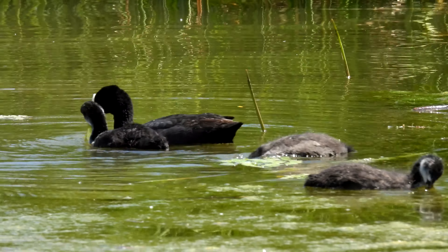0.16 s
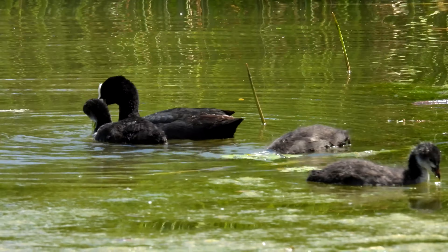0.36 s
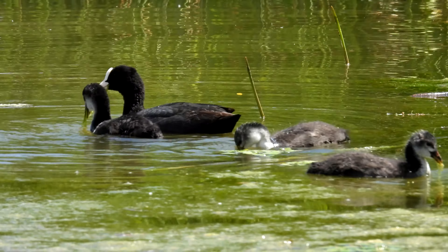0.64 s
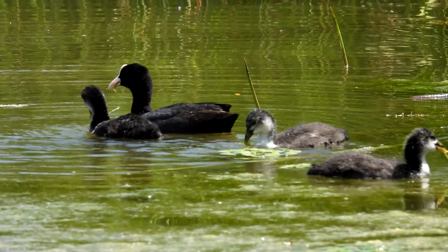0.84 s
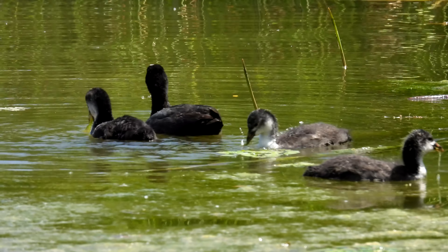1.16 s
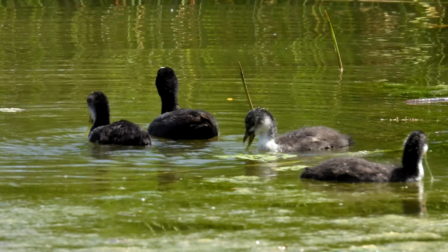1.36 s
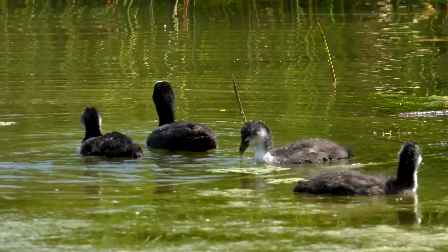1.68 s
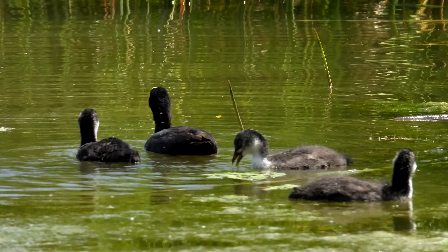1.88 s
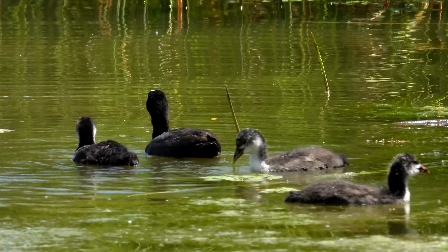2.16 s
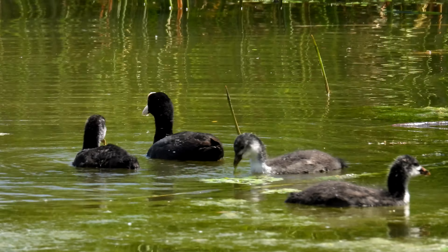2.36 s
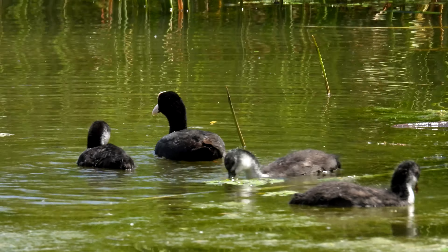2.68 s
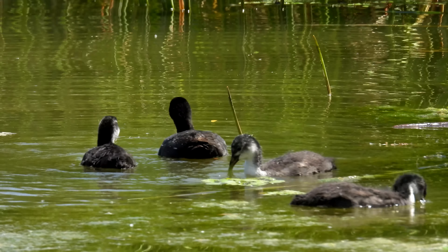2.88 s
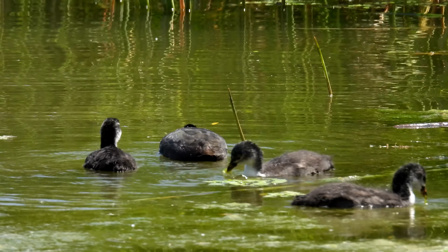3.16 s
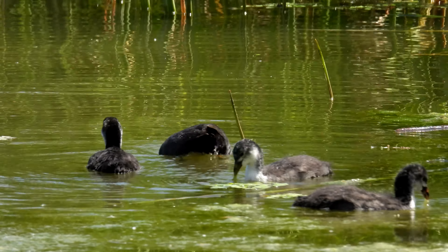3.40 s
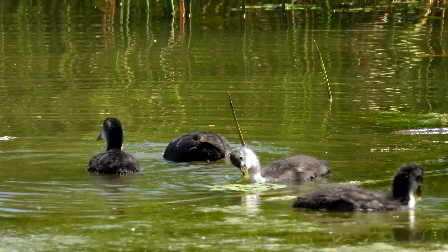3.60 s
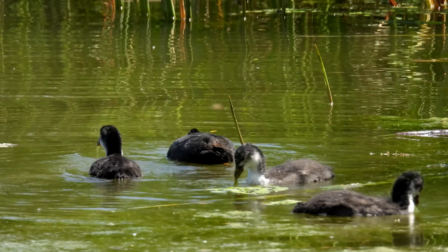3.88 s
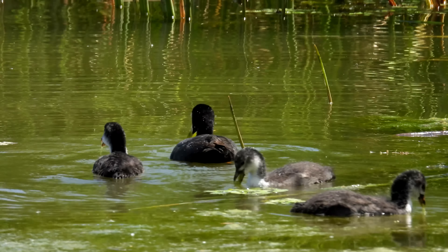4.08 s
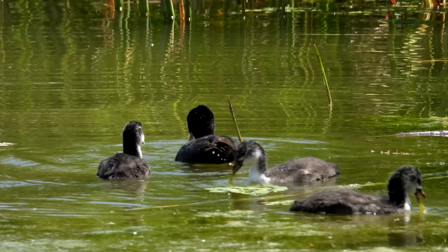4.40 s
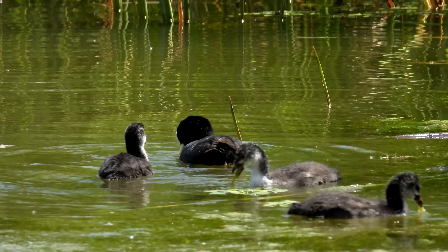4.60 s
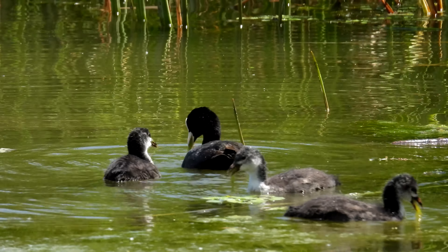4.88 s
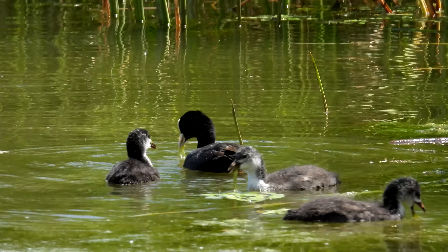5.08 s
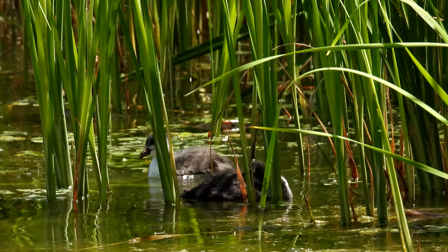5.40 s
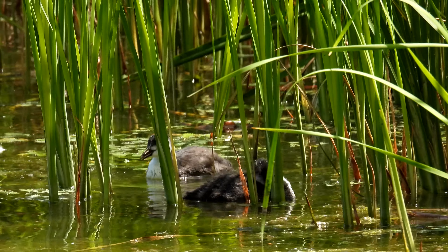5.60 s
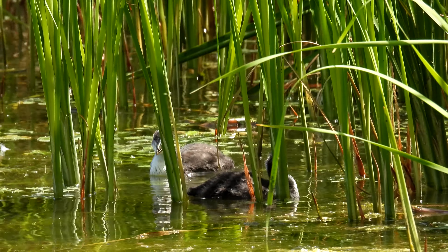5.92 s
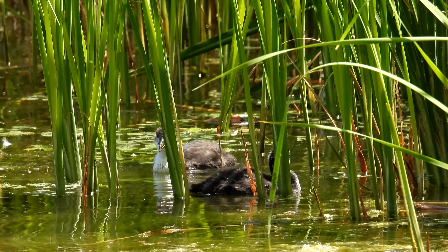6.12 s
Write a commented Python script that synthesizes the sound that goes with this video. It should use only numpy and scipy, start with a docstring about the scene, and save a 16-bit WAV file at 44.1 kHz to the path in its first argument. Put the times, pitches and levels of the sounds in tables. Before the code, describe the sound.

Rapid, scratchy warbler song bursts and pauses beside a reedy pond, with faint birds beyond, then two short frog croaks and a tiny water tick.

```python
"""You hear a reed warbler at a pond: nasal chatter, rasps, looping whistles, buzzes, a trill and paired chirps.
Other birds call farther off, over a faint hiss; near the end a frog croaks twice and one water drop ticks.
Each kind of syllable is one gesture of pitch and level, sung by a stack of harmonics that can turn rough.
Frog pulses ring three resonances, the drop is a fading burst of noise and the air is filtered noise.
Sparse echoes scatter the near song among the reeds and blur the fainter calls."""
import sys
import numpy as np
from scipy import signal
from scipy.fft import rfft, irfft, next_fast_len
from scipy.io import wavfile
from scipy.ndimage import uniform_filter1d

SR = 44100
rng = np.random.default_rng(int(sys.argv[2]) if len(sys.argv) > 2 else 0)


def inscribe(sig):
    """Save sig as 16-bit PCM at rate SR to the path in sys.argv[1].

    A 1-D sig is mono; a 2-D sig holds one channel per row.
    Samples are clipped to [-1, 1] before scaling.
    """
    pcm = np.round(np.clip(np.atleast_2d(sig).T, -1, 1) * 32767)
    wavfile.write(sys.argv[1], SR, pcm.astype(np.int16))


N = 275622
TIME = np.arange(N) / SR  # seconds

# Base levels in these tables come before the shaping of each note, filters and distance.
# Short flat notes. Each row: start in seconds, length in seconds, lowest pitch in Hz, base level in dB.
CHATTER_NOTES = [(0, 0.01, 1087, -24), (0.044, 0.019, 1117, -26.5), (0.156, 0.021, 1105, -25),
                 (0.215, 0.032, 1087, -24.5), (3.428, 0.039, 1078, -41), (3.477, 0.038, 1079, -37),
                 (3.515, 0.024, 1064, -38.5), (3.538, 0.039, 1121, -36), (3.727, 0.044, 1073, -35),
                 (3.779, 0.017, 1157, -29), (3.793, 0.027, 1125, -32), (3.827, 0.036, 1099, -33.5),
                 (3.861, 0.018, 1061, -40)]
# Nasal notes, held and then bent. Each row: start in seconds, length in seconds, held pitch in Hz,
# bend as a share of the pitch, base level in dB, tilt in dB per harmonic.
NASAL_NOTES = [(0.027, 0.022, 1365, -0.19, -32.5, 3.5), (0.046, 0.013, 1464, 0.35, -25, 1.5),
               (0.064, 0.023, 1362, -0.23, -23.5, 1.5), (0.101, 0.031, 1386, -0.061, -21, 1.5),
               (0.227, 0.015, 1355, 0.17, -31.5, 1.5), (0.244, 0.016, 1469, 0.33, -26.5, 2),
               (0.261, .025, 1347, -0.22, -25, 1), (0.284, 0.013, 1509, 0.085, -23.5, 1.5),
               (0.303, 0.026, 1351, 0.064, -22, 1), (3.086, 0.12, 1400, -0.28, -35, 0)]
# Quick slurs up or down. Each row: start in seconds, length in seconds, first pitch in Hz,
# last pitch in Hz, base level in dB.
QUICK_SLURS = [(0.055, 0.012, 1505, 2480, -17.5), (0.078, 0.011, 1860, 2295, -17.5),
               (0.086, 0.017, 1503, 1805, -17), (0.255, 0.0128, 1486, 2230, -24),
               (0.278, 0.0084, 1818, 2340, -15.5), (0.294, 0.009, 1530, 1820, -18.5),
               (0.671, 0.0042, 2190, 1855, -18.5), (1.089, 0.015, 1803, 1240, -30.5),
               (1.352, 0.013, 2183, 2140, -31), (1.591, 0.0077, 1790, 1590, -32),
               (1.675, 0.014, 1857, 1260, -30)]
# Rasps. Each row: start in seconds, length in seconds, top pitch before flutter in Hz, base level in dB.
RASP_NOTES = [(0.42, 0.12, 2388, -32), (0.65, 0.11, 2034, -28)]
# Looping whistles. Each row: time of the opening flick in seconds, time of the crest in seconds,
# trough pitch in Hz, crest pitch in Hz, base level in dB.
LOOPING_WHISTLES = [(0.91, 1.006, 1550, 1813, -34), (1.108, 1.175, 1609, 2212, -34.5),
                    (1.352, 1.444, 1677, 2077, -34), (1.585, 1.675, 1637, 2046, -35)]
# Two-voiced buzzes. Each row: start in seconds, length in seconds, top pitch of the upper voice in Hz,
# place of the top from 0 to 1, base level in dB.
BUZZ_NOTES = [(1.93, 0.1, 1158, 0.51, -34), (2.021, 0.042, 1044, 0.73, -39.5),
              (2.175, .138, 1139, .62, -36), (2.477, 0.12, 1124, 0.48, -37.5)]
# Path of the trill. Each row: time in seconds, pitch in Hz, base level in dB.
TRILL_PATH = [(2.748, 1494, -46.5), (2.782, 1753, -39), (2.9, 1749, -36.5), (2.988, 1807, -41.5)]
# Rising chirps, in pairs. Each row: start in seconds, length in seconds, top pitch in Hz,
# base level in dB, resonance of the open beak in Hz, roughness from 0 to 1.
PAIRED_CHIRPS = [(4.032, 0.077, 737, -35.5, 4380, 0.4), (4.13, 0.054, 688, -35, 4190, 0.27),
                 (4.312, 0.061, 707, -35, 4100, 0.61), (4.387, 0.065, 680, -34, 4150, 0.27),
                 (4.786, 0.056, 689.5, -34.5, 3540, 0.39), (4.862, 0.063, 671, -34, 3470, 0.29)]

# The throat favours other harmonics for each kind of syllable.
# Each list: relative strength in dB of harmonic 1, 2, 3, and so on.
CHATTER_HARMONICS = [-44, -9.5, 6.5, -4.5, -24, -26, -47]
NASAL_HARMONICS = [-30.5, -10, -1, -19, -31.5, -30, -24, -28.5]
# Nearly pure tone on harmonic 2, as above: relative dB of harmonic 1, 2, 3.
PURE_HARMONICS = [-17.5, 20.7, -14]
# Whistles, as above: relative dB of harmonic 1, 2, 3.
WHISTLE_HARMONICS = [-11.5, 20, 0]
# Upper and lower voice of the buzzes, as above: relative dB of harmonic 1, 2, 3, and so on.
BUZZ_HARMONICS = [-9, 0, 6, 1, -19]
LOW_BUZZ_HARMONICS = [-16.5, -7.5, 6.5, 2.5, -4]
# Upper voice of the trill, then the chirps, as above: relative dB of harmonic 1, 2, 3, and so on.
TRILL_HARMONICS = [-16.5, 0, -20]
CHIRP_HARMONICS = [-35, -32, 2, -1, 8, 14.5, -13, -2]

# Twitter from across the pond. Each row: time in seconds, base level in dB.
TWITTER_LEVEL = [(0, -56.5), (.6, -54.5), (1.1, -52.5), (2.12, -51.5), (2.4, -76.5), (2.68, -55.5),
                 (3.3, -67), (4.0, -65.5), (4.5, -58), (5.7, -52.5), (6.25, -52)]
# Calls of far birds. Each row: start in seconds, length in seconds, middle pitch in Hz, base level in dB.
DISTANT_CALLS = [(0.584, 0.064, 3170, -48), (0.784, 0.033, 3920, -40.5), (1.208, 0.07097, 2994, -43),
                 (1.495, 0.039, 2984, -42.5), (1.852, 0.1, 2532, -48), (2.39, 0.12, 2980, -58),
                 (4.659, 0.28, 1120, -69), (4.696, 0.063, 2214, -56), (4.74, 0.048, 2890, -47),
                 (4.963, 0.062, 2863, -49), (5.031, 0.064, 2740, -45), (5.122, 0.08052, 2156, -54.5),
                 (5.183, 0.078, 2860, -48), (5.256, 0.059, 2794, -42.5), (5.361, 0.09, 2237, -54),
                 (5.432, 0.062, 2870, -46.5), (5.497, 0.054, 2726, -41)]
# Faint hoarse slurs: far birds, and at 1.044 s an echo. Each row: start in seconds, length in seconds,
# first pitch in Hz, last pitch in Hz, base level in dB.
FAINT_SLURS = [(1.044, 0.028, 3850, 3963, -37), (1.304, 0.043, 4100, 3860, -41),
               (4.653, 0.066, 4026, 5130, -51.5), (5.015, 0.11, 4450, 3580, -52.5),
               (5.252, 0.061, 3890, 4296, -43.5), (5.562, 0.068, 3960, 4310, -43.5),
               (5.732, 0.0229, 3104, 3836, -41.5), (5.898, 0.065, 3945, 4196, -46),
               (5.993, 0.014, 3260, 3734, -41)]
# Pulses of the frog. Each row: time in seconds, peak level before the final filter in dB.
FROG_PULSES = [(5.746, -39), (5.781, -36.5), (5.811, -34), (6.071, -37.5), (6.103, -34), (6.135, -28)]
# Resonances of the frog's vocal sac. Each row: frequency in Hz, width in Hz, relative strength in dB.
VOCAL_SAC = [(1280, 46, -3), (1870, 280, 20), (2310, 350, 19)]
# Colour of the background air. Each row: frequency in Hz, relative density in dB per Hz.
AIR_SPECTRUM = [(225, -10.5), (330, -1.5), (650, -6.5), (1000, 7.5), (4000, -4.5), (6500, 4), (12500, -0.5)]
# Loudness of the background air. Each row: time in seconds, rms level in dB.
AIR_LOUDNESS = [(0, -66.5), (2.2, -69), (2.22, -73), (5.24, -74), (5.26, -70.5)]


def gain_of(db):
    """Turns decibels into amplitude."""
    return 10 ** (np.asarray(db) / 20)


def evened(x):
    """Scales a sound to rms 1."""
    return x / np.sqrt(np.mean(x ** 2) + 1e-20)


def read(points, hz):
    """Reads a spectrum on a log-frequency axis."""
    f, value = np.transpose(points)
    return np.interp(np.log(hz + 1), np.log(f), value)


def add(mix, s, sound):
    """Mixes a sound in at time s."""
    part = mix[max(round(s * SR), 0):][:len(sound)]
    part += sound[:len(part)]


def band(x, low_hz, high_hz):
    """Keeps the sound between two frequencies, with smooth edges."""
    return signal.sosfilt(signal.butter(3, [low_hz, high_hz], "band", fs=SR, output="sos"), x)


def wobble(size, hz):
    """Random motion of about rms 1, mostly slower than hz."""
    padded = next_fast_len(size + 2048)
    f = np.fft.rfftfreq(padded, 1 / SR)
    slowed = rfft(rng.standard_normal(padded)) / (1 + (f / hz) ** 4)
    return evened(irfft(slowed))[:size]


def fade(t, edge_s):
    """A soft start and end."""
    nearest_end = np.minimum(t - t[0], t[-1] - t)
    return np.sin(np.pi / 2 * np.clip(nearest_end / edge_s, 0, 1)) ** 2


def progress(length):
    """Runs from 0 to 1 over a note."""
    return np.linspace(0, 1, round(length * SR))


def arch(u, top, first, last):
    """Two half parabolas: from first to 0 at the share top of the note, then on to last."""
    top = np.clip(top, 0.05, 0.95)
    before = first * (1 - u / top) ** 2
    after = last * ((u - top) / (1 - top)) ** 2
    return np.where(u < top, before, after)


def syrinx(hz, rough, throat, tilt_db=0, beak_hz=0, wander_db=0, jitter=0.046, jitter_hz=380, shimmer=0.62,
           beak_db=12, beak_width_hz=520, wander_hz=55, hiss=0.71, hiss_width_hz=750):
    """Harmonics of a vibrating membrane; roughness shakes pitch and strength and adds hiss."""
    size = len(hz)
    turns = np.cumsum(hz * (1 + jitter * rough * wobble(size, jitter_hz))) / SR
    weights = []
    for k, db in enumerate(throat, 1):
        # the beak lifts harmonics near its resonance
        beak_lift = beak_db * np.exp(-((k * hz - beak_hz) / beak_width_hz) ** 2)
        weights.append(gain_of(db + k * tilt_db + beak_lift))
    weights = np.array(weights)
    weights /= np.linalg.norm(weights, axis=0)
    # the hiss follows the power-weighted mean of the harmonics
    mean_harmonic = sum(k * w ** 2 for k, w in enumerate(weights, 1))
    hiss_phase = 2 * np.pi * np.cumsum(hz * mean_harmonic) / SR
    if wander_db:
        weights *= gain_of([wander_db * wobble(size, wander_hz) for _ in throat])
    tone = np.zeros(size)
    for k, weight in enumerate(weights, 1):
        tone += weight * np.sin(2 * np.pi * (k * turns + rng.random()))
    for wave in (np.sin, np.cos):
        tone += hiss * rough * wave(hiss_phase) * wobble(size, hiss_width_hz)
    return np.sqrt(2) * tone * (1 + shimmer * rough * wobble(size, 2 * jitter_hz))


def sing(gesture, syllables, throat, rough=0, crack=0, flutter=0, wander_db=0,
         flutter_hz=135, flutter_after_s=0.0182):
    """Sings each syllable by the gesture of its kind; flutter swings the pitch after the attack."""
    def note(start, hz, level, tilt, beak_hz=0, own_rough=0):
        """Makes one syllable from its pitch, level and colour."""
        t = TIME[:len(hz)]
        # the membrane rattles where the pitch jumps
        jumps = uniform_filter1d(abs(np.gradient(np.log(hz), t)), size=400)
        harsh = np.minimum(rough + own_rough + crack * jumps, 1)
        onset = np.clip(t / flutter_after_s - 1, 0, 1)
        swing = np.sin(2 * np.pi * flutter_hz * t + wobble(len(t), flutter_hz))
        hz = hz * (1 + flutter * onset * swing)
        voice = syrinx(hz, harsh, throat, tilt, beak_hz, wander_db)
        return start, gain_of(level) * fade(t, 0.0014) * voice
    out = np.zeros(N)
    for row in syllables:
        add(out, *note(*gesture(*row)))
    return out


def air():
    """A faint hiss of shaped noise that is quieter through the middle."""
    shape = gain_of(read(AIR_SPECTRUM, np.fft.rfftfreq(N, 1 / SR)))
    noise = irfft(rfft(rng.standard_normal(N)) * shape, N)
    return evened(noise) * gain_of(np.interp(TIME, *np.transpose(AIR_LOUDNESS)))


def twitter(hz=3600, spread=0.39, edge_db=-14, glide=0.0994, length_s=0.06, rough=0.72, count=300):
    """Many rough gliding notes of distant warblers run together; the highest and lowest are faintest."""
    out, t = np.zeros(N + SR), np.arange(0, length_s, 1 / SR)
    for k, (shift, height, slope) in enumerate(rng.uniform(-1, 1, (count, 3))):
        pitch = hz * np.exp(spread * height + glide * slope * (t / length_s - 0.5))
        level = gain_of(edge_db * height ** 2) * fade(t, length_s / 2)
        start = (k + shift / 2) * N / SR / count
        add(out, start, level * syrinx(pitch, rough, [0]))
    return evened(out[:N]) * gain_of(np.interp(TIME, *np.transpose(TWITTER_LEVEL)))


def chatter(start, length, hz, db):
    """A short, nearly flat note whose pitch dips slightly in the middle."""
    u = progress(length)
    pitch = hz * (1 + arch(u, top=0.49, first=0.067, last=0.087))
    return start, pitch, db + arch(u, top=0.49, first=-9.0, last=-11.0), 0


def nasal(start, length, hz, bend, db, tilt_db, lateness=6.5, swell_db_per_s=140, dulling_db=-35):
    """A held pitch that swells, then bends and dulls as the note dies."""
    u = progress(length)
    slide = bend * u ** lateness
    level = db + arch(u, top=0.64, first=-swell_db_per_s * length, last=-13.5)
    return start, hz * (1 + slide), level, tilt_db + dulling_db * abs(slide)


def slur(start, length, first_hz, last_hz, db, lateness=1.44):
    """A glide in pitch that gathers speed and swells."""
    u = progress(length)
    pitch = first_hz + (last_hz - first_hz) * u ** lateness
    return start, pitch, db + arch(u, top=1.0, first=-13.0, last=-0.69), 0


def rasp(start, length, top_hz, db, low_hz=1130, rise_s=0.018, sag_s=0.047, floor_hz=1220):
    """A leap up to the top pitch that then sinks and fades."""
    u = progress(length)
    t = u * length
    sinking = floor_hz + (top_hz - floor_hz) * np.exp(-(np.maximum(t - rise_s, 0) / sag_s) ** 1.5)
    rise = np.sin(np.pi / 2 * np.minimum(t / rise_s, 1))
    level = db + np.interp(u, [0, 0.1, 0.22, 0.75, 1], [-13.5, 3.5, -5.0, -4.0, -9.0])
    return start, low_hz + (sinking - low_hz) * rise, level, 0


def far_birds(sag=0.027, rough=0.17):
    """Soft, slightly rough whistles that sag a little in pitch."""
    out = np.zeros(N)
    for s, length, hz, db in DISTANT_CALLS:
        u = progress(length)
        pitch = hz * (1 + sag * (0.5 - 2 * u ** 2))
        add(out, s, gain_of(db) * np.sin(np.pi * u) * syrinx(pitch, rough, [0]))
    return out


def whistle(flick, crest, trough_hz, crest_hz, db, lead_s=0.01, flick_hz=250, flick_s=0.00837,
            climb_s=0.026, drop_s=0.026, end_hz=1030, flick_db=14, drop_db=13.0, flick_accent_s=0.0037,
            drop_accent_s=0.0075, accent_lag_s=0.013, tuned_hz=1550, detuned_db=-42):
    """Flicks down into a trough, climbs to a crest and plunges, with both downward sweeps accented."""
    t = np.arange(flick - lead_s, crest + drop_s, 1 / SR)
    flick_sweep = flick_hz * np.exp((flick - t) / flick_s)
    climb = (crest_hz - trough_hz) * np.exp(-((t - crest) / climb_s) ** 2)
    hz = trough_hz + flick_sweep + climb
    plunge = np.sin(np.pi / 2 * np.clip((t - crest) / drop_s, 0, 1) ** 1.35) ** 2
    hz += (end_hz - hz[-1]) * plunge
    accents = flick_db * np.exp(-((t - flick) / flick_accent_s) ** 2)
    accents += drop_db * np.exp(-((t - crest - accent_lag_s) / drop_accent_s) ** 2)
    # stage 0 is the flick, stage 1 the crest
    stage = np.interp(t, [t[0], flick, crest, t[-1]], [-1, 0, 1, 2])
    effort = np.interp(stage, [-1.5, -0.12, 0.05, 1.01, 1.04, 1.91], [-4, -6.5, -11.5, 1, 1, -14.5])
    # higher harmonics weaken where the pitch strays from the tuning of the throat
    tilt_db = detuned_db * abs(np.log(hz / tuned_hz))
    return t[0], hz, db + effort + accents, tilt_db, 0, 0.021 * accents


def buzz(start, length, top_hz, top, db, open_hz=4400, shut_hz=2100):
    """Pitch and level swell and fall; the closing beak shifts the weight to lower harmonics."""
    u = progress(length)
    pitch = top_hz * (1 + arch(u, top, first=-0.0917, last=-0.26))
    level = db + arch(u, top + 0.063, first=-16.5, last=-16)
    beak_hz = open_hz + (shut_hz - open_hz) * np.sin(np.pi / 2 * u) ** 2
    return start, pitch, level, 0, beak_hz


def low_buzz(start, length, top_hz, top, db):
    """The other side of the syrinx sings the same gesture a little lower, and the two clash."""
    return buzz(start, length, 0.81 * top_hz, top, db)


def trill(period_s=0.0282, waver=0.016, lag_s=0.0057, between=0.3, low_voice=0.885, low_db=-10, rough=0.2):
    """A run of short pips that steps up in wavering pitch, with a fainter lower voice beneath."""
    s, hz, db = np.transpose(TRILL_PATH)
    out, t = np.zeros(N), np.arange(s[0], s[-1], 1 / SR)
    pips = between + np.cos(np.pi * (t - s[1] - lag_s) / period_s) ** 4
    pips *= fade(t, period_s / 2)
    pitch = np.interp(t, s, hz) * (1 + waver * wobble(len(t), 2 / period_s))
    upper = syrinx(pitch, rough, TRILL_HARMONICS)
    lower = gain_of(low_db) * syrinx(low_voice * pitch, rough, PURE_HARMONICS, wander_db=2.5)
    add(out, s[0], gain_of(np.interp(t, s, db)) * pips * evened(upper + lower))
    return out


def chirp(start, length, top_hz, db, open_hz, rough, shut_hz=2500):
    """The pitch rises and levels off; the opening beak's resonance climbs across the harmonics."""
    u = progress(length)
    pitch = top_hz * (1 + arch(u, top=0.8, first=-0.32, last=-0.013))
    level = db + arch(u, top=0.7, first=-23.5, last=-12)
    beak_hz = shut_hz + (open_hz - shut_hz) * np.sin(np.pi / 2 * u) ** 2
    return start, pitch, level, 0, beak_hz, rough


def warbler():
    """The whole song of the near bird, rounded off by its beak with a band-pass."""
    song = sing(chatter, CHATTER_NOTES, CHATTER_HARMONICS, rough=0.16, crack=0.0019, wander_db=1.5)
    song += sing(nasal, NASAL_NOTES, NASAL_HARMONICS, rough=0.11, crack=0.0063)
    song += sing(slur, QUICK_SLURS, PURE_HARMONICS, rough=0.16)
    song += sing(rasp, RASP_NOTES, PURE_HARMONICS, rough=0.3, flutter=0.11)
    song += sing(whistle, LOOPING_WHISTLES, WHISTLE_HARMONICS, rough=0.19, wander_db=3.0)
    buzzes = sing(buzz, BUZZ_NOTES, BUZZ_HARMONICS, rough=0.25, wander_db=1.5)
    buzzes += sing(low_buzz, BUZZ_NOTES, LOW_BUZZ_HARMONICS, rough=0.28, wander_db=2.0)
    song += buzzes / np.sqrt(2)
    song += trill()
    song += sing(chirp, PAIRED_CHIRPS, CHIRP_HARMONICS, wander_db=2.5)
    return band(song, low_hz=970.0, high_hz=5560)


def frog(ring_s=0.00275, echo_s=0.012, echo_db=-13):
    """Each pulse is a brief rattle that rings the vocal sac and returns from the bank."""
    out, t = np.zeros(N), np.arange(0, 0.02, 1 / SR)
    sac = np.zeros(len(t))
    for hz, width, db in VOCAL_SAC:
        sac += gain_of(db) * np.exp(-np.pi * width * t) * np.sin(2 * np.pi * hz * t)
    for s, db in FROG_PULSES:
        rattle = rng.standard_normal(len(t)) * np.exp(-(t / ring_s - 1) ** 2)
        pulse = signal.fftconvolve(rattle, sac)
        pulse *= gain_of(db) / abs(pulse).max()
        add(out, s - ring_s / 2, pulse)
        add(out, s + echo_s, gain_of(echo_db) * pulse)
    return band(out, low_hz=1187.3, high_hz=3300)


def drip(start_s=5.983, noise_db=-42.5, decay_s=0.002086):
    """One soft tick of water: a quickly fading burst of noise through a band-pass."""
    out = np.zeros(N)
    t = TIME[:SR // 20]
    add(out, start_s, gain_of(noise_db) * rng.standard_normal(len(t)) * np.exp(-t / decay_s))
    return band(out, low_hz=620, high_hz=3730)


def scatter(x, t60, delay_s):
    """Scattered echoes: sparse taps of random sign, total energy 1, falling 60 dB in t60 seconds."""
    t = TIME[:SR]
    signs = rng.choice([-1.0, 1.0], SR)
    present = (rng.random(SR) < 1 / 20) * (t > delay_s)
    taps = signs * present * np.exp(-np.log(1000) * t / t60)
    return signal.fftconvolve(x, taps / np.linalg.norm(taps))[:N]


def scene():
    """Near stems echo the song at once, reeds and leaves add tails, and faint calls are more scattered."""
    background = air()
    faint = twitter() + far_birds() + sing(slur, FAINT_SLURS, [0], rough=0.41)
    song = warbler()
    stems = gain_of(-7.0) * scatter(song, t60=0.11, delay_s=0.0062)
    reed_bed = gain_of(-22.5) * scatter(song, t60=0.8, delay_s=0.059)
    bright_song = band(song, low_hz=3796, high_hz=4750)
    leaves = gain_of(-9) * scatter(bright_song, t60=0.3, delay_s=0.014)
    blurred = gain_of(-2) * (faint + scatter(faint, t60=0.7, delay_s=0))
    mix = background + blurred + song + stems + reed_bed + leaves + frog() + drip()
    return mix[None]  # one channel


def record(dry, edge_hz=15750):
    """Removes the treble above edge_hz with a steep low-pass filter."""
    low_pass = signal.firwin(511, edge_hz, window=("kaiser", 9), fs=SR)
    return signal.oaconvolve(dry, low_pass[None], "same")


dry = scene()
out = record(dry)
inscribe(out)
```